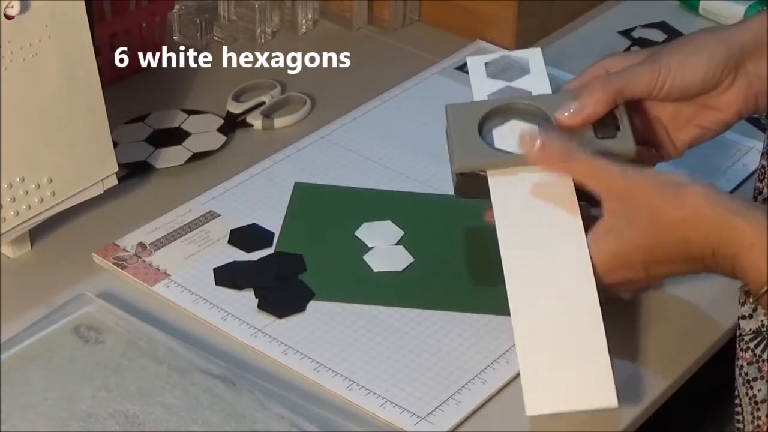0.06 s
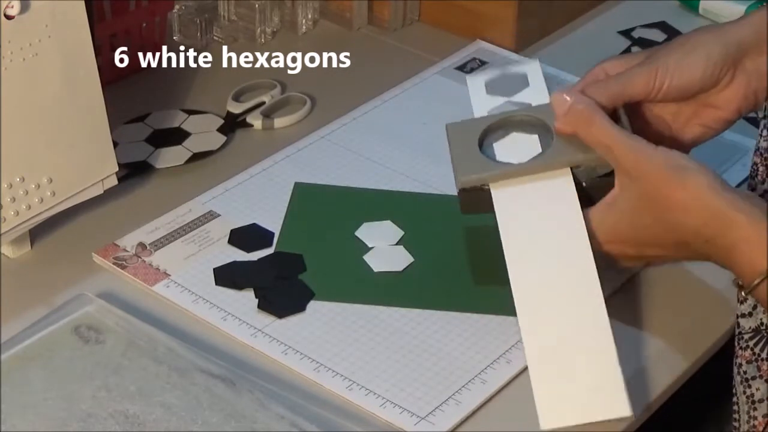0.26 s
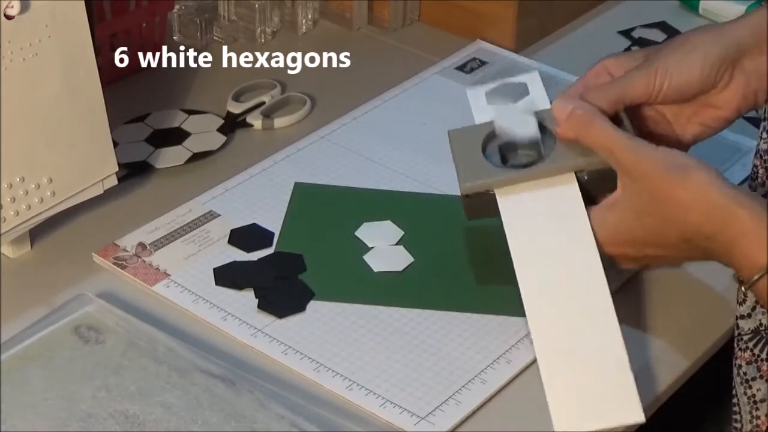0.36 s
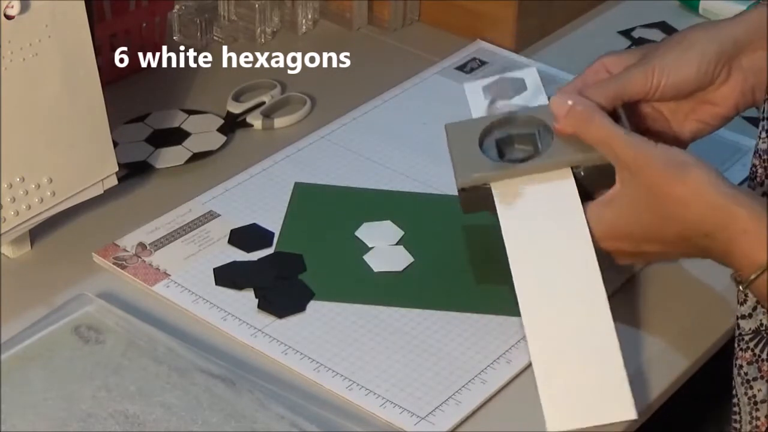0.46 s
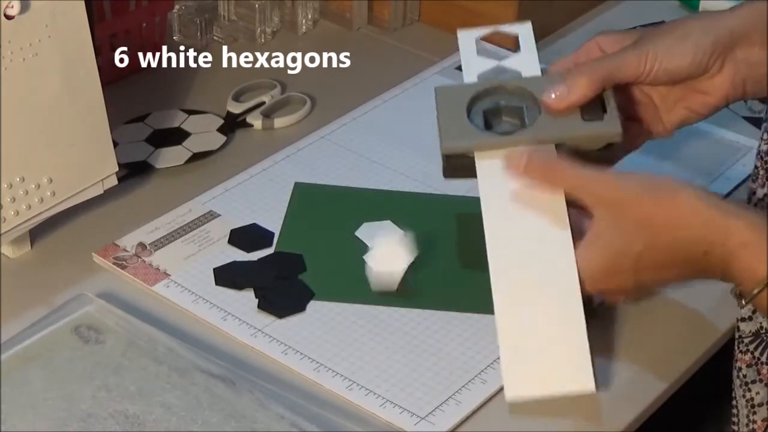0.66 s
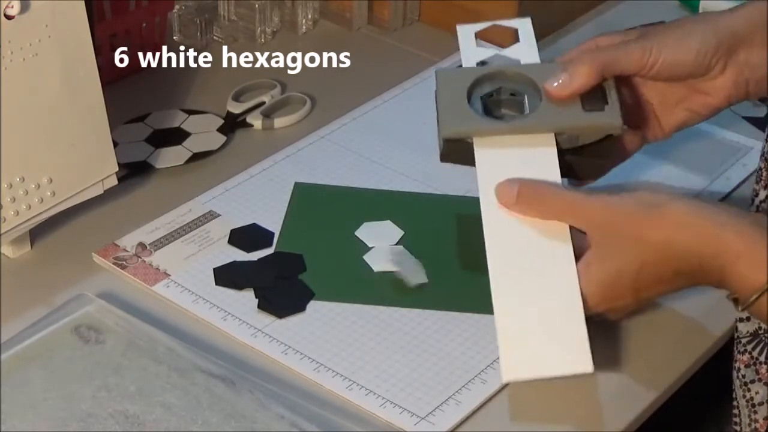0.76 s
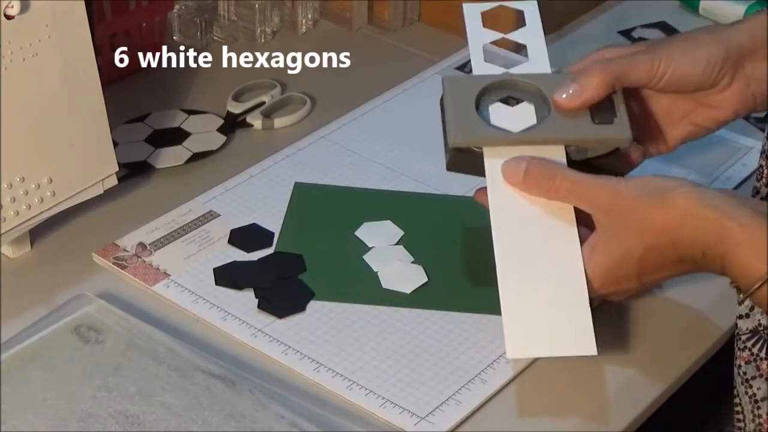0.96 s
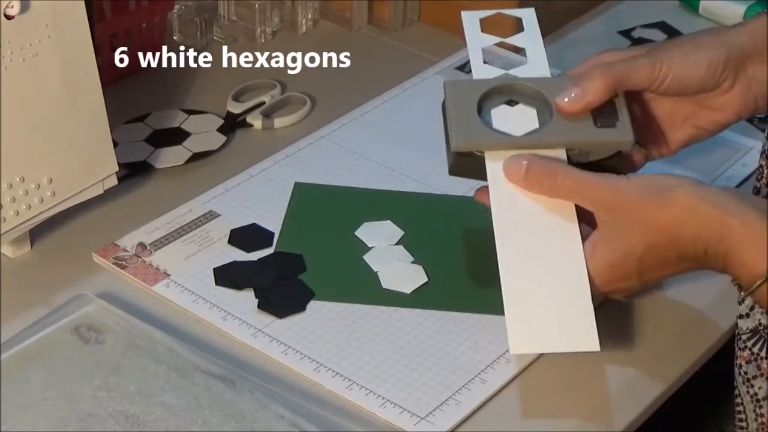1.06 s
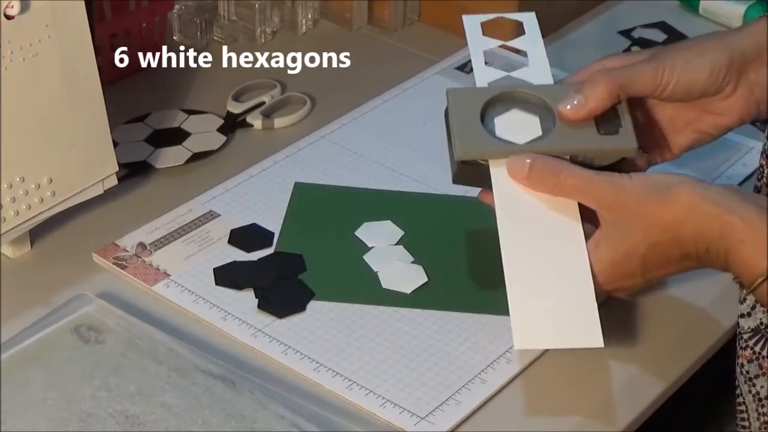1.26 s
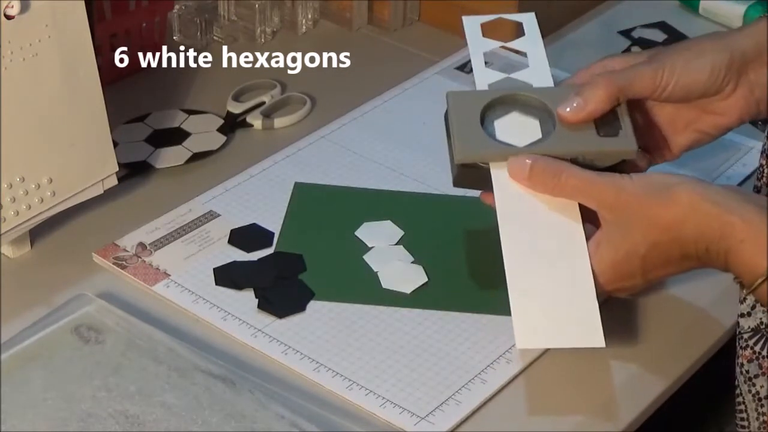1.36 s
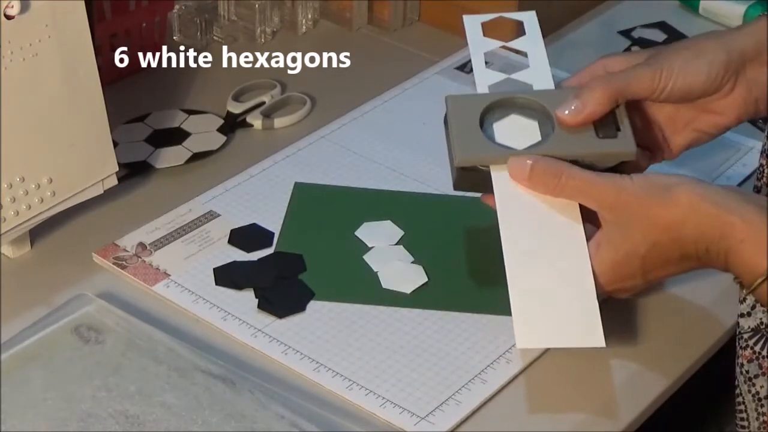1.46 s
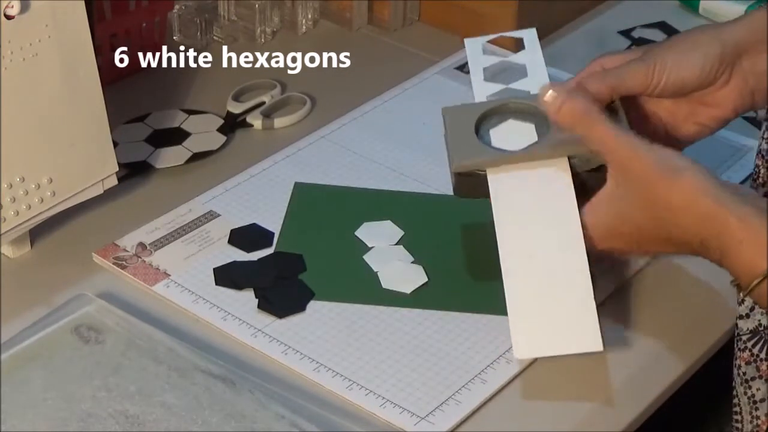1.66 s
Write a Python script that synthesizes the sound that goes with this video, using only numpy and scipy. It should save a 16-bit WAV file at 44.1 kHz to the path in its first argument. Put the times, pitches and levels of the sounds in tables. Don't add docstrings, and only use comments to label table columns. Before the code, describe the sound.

After near silence, one crisp crackling punch cut in stiff card, a short metallic rattle, lever clicks, then a papery rub and catch fading into soft room hush with faint even ticks, heard up close.

```python
import sys
import numpy as np
from scipy import signal
from scipy.io import wavfile
from scipy.ndimage import uniform_filter1d

SR = 44100
rng = np.random.default_rng(int(sys.argv[2]) if len(sys.argv) > 2 else 0)


def voltage_ratio(decibels):
    exponent = np.asarray(decibels, float) / 20
    return 10 ** exponent


def wav_record(signal):
    frames = np.transpose(np.atleast_2d(signal))
    bounded = np.clip(frames, -1, 1)
    quanta = np.round(bounded * 32767).astype(np.int16)
    wavfile.write(sys.argv[1], SR, quanta)


N = 74970

KNOCK_TIMES = [.2272, .2317, .241, .308, .3346, .3362, .3394, .5235, .5325, .6545, .700, .7153, .7262,
               .7278]
# (peak [dB], crack t60 [s], colour [Hz], colour level [dB], body ring [dB])
KNOCKS = [(-14.5, 0.017, 7300, -7.5, 3), (-14, 0.006, 3100, 4.5, 5), (-28.5, 0.057, 1580, 8.5, -7),
          (-17.5, 0.022, 3280, 5, -9.5), (-10.5, 0.0073, 2430, 0, -9.5), (-18.5, 0.0029, 10500, 18, -19),
          (-18, 0.015, 6700, 10, -1), (-41.5, 0.069, 12000, -1.5, -26), (-34.5, 0.014, 7300, 2, -3),
          (-22.5, 0.0061, 1940, 5, -21), (-46, 0.16, 9900, -21, -14), (-30, .016, 6500, 1, -8),
          (-23, 0.0058, 6400, 17, 5), (-18.5, 0.0095, 4560, -2, 5.5)]
# (start [s], rise [s], t60 [s], level [dB], body ring [dB])
CRUNCHES = [
    (0.2227, 0.0045, 0.077, -19.5, -36),
    (0.243, 0.0063, 0.11, -25.5, 2),
    (0.272, 0.0074, 0.063, -23.5, -6),
    (0.3041, 0.0011, 0.096, -19.5, -16.5),
    (0.308, 0.0023, 0.051, -40, 12.5),
    (0.328, 0.00091, 0.013, -23.5, -5),
    (0.659, 0.022, 0.057, -35, -28),
    (0.728, 0.002, 0.34, -36.5, -5),
]
# (time [s], peak [dB], t60 [s], resonance [Hz], width [Hz])
TAPS = [(0.0465, -49, 0.035, 6700, 1500), (0.0476, -51.5, .05, 10700, 700), (0.127, -47, 0.095, 3260, 300),
        (0.142, -53, 0.16, 3300, 400), (0.127, -64, .025, 6640, 6000), (.2035, -60, 0.015, 7800, 4000),
        (0.255, -22, 0.026, 3740, 600), (0.275, -25, 0.031, 592, 142), (.306, -26.5, 0.026, 546, 119),
        (0.775, -45, 0.12, 1560, 250), (.88, -48, 0.12, 3740, 1200), (.525, -44.5, 0.18, 906, 50.6),
        (.589, -43.5, 0.034, 6500, 5000), (.606, -47.5, 0.26, 3270, 500), (.6548, -36.5, 0.085, 507, 300),
        (0.6543, -35, 0.048, 900, 250), (0.681, -36, 0.095, 1390, 300), (1.452, -56, 0.04, 4260, 1500)]
# (time [s], level [dB])
RATTLE_LEVEL = [(.341, -40), (.347, -3), (.356, -2), (.37, -4), (.39, -9), (.44, -20.5), (.5, -32.5),
                (.56, -39), (.6, -89)]
# (time [s], level [dB])
SLIDE_LEVEL = [(0, -75), (.05, -76), (.085, -82), (.14, -82), (.19, -54), (.215, -54), (.58, -56),
               (.61, -46.5), (.645, -38.5), (.72, -33.5), (.78, -40.5), (.825, -37.5), (.92, -47.5),
               (.97, -51.5), (1.1, -60), (1.47, -94), (1.6, -69), (1.7, -55.5)]
# (mode [Hz], level [dB], t60 [s])
PRESSED_MODES = [(524, -1.5, 0.16), (632, -3.5, 0.15), (790, -2, 0.04), (1013, -12, 0.068),
                 (1080, -7.5, 0.082), (1330, 7.5, 0.033), (1329, 18, 0.035), (1455, 12, 0.04),
                 (1533, 3, 0.054), (1775, -2.5, 0.21), (2040, -4, 0.12), (2205, 0.5, 0.12),
                 (3540, 11.5, 0.035), (5620, 13, 0.014)]
# (mode [Hz], level [dB], t60 [s])
FREE_MODES = [(917, 1, 0.091), (1078, 7, 0.085), (1206, -8, 0.099), (1268, 7, 0.11), (1396, 3.5, 0.044),
              (1520, 0.5, 0.11), (1595, 9.5, 0.028), (1875, -18, 0.13), (2138, 0, 0.11), (2340, 2.5, 0.046),
              (3460, -1, 0.05), (4320, -10, 0.079), (5100, 0.5, 0.05), (6700, -4, 0.032)]
# (mode [Hz], level [dB], t60 [s])
CATCH_MODES = [(1070, -15, 0.08), (1203, -9.5, 0.18), (1388, 0, 0.021), (1437, -6, 0.064),
               (1618, 6.5, 0.043), (2060, -4, 0.066), (3570, -22, 0.016), (4474, 8.5, 0.0099),
               (6100, -5, 0.047), (8010, 10.5, 0.009), (9200, -8, 0.038)]
# (frequency [Hz], density [dB per Hz])
CRACK_TONE = [(120, -36), (200, -28), (503, -10), (1000, -9.5), (1420, -2), (2400, -5.5), (3700, -3.5),
              (11000, -4.5)]
# (frequency [Hz], density [dB per Hz])
RATTLE_TONE = [(400, -39), (650, -22), (900, -11), (1300, 1), (1750, -7), (6400, -7.5), (11000, -13),
               (14000, -41)]
# (frequency [Hz], density [dB per Hz])
SLIDE_TONE = [(350, -47), (600, 4.5), (678, -30), (747, 3), (2850, 2.5), (4360, 5), (11000, -2),
              (14300, -58), (22000, -120)]
# (frequency [Hz], density [dB per Hz])
HUSH_TONE = [(20, -31), (45, -27), (85, -14), (157, -9.5), (252, -7.5), (295, -6.5), (328, -10.5),
             (385, -9.5), (572, -13), (11000, -34.5), (14300, -75.5), (22000, -120)]
# (frequency [Hz], likeness [0-1])
LIKENESS = [(60, 1), (350, 0.85), (1980, 0.32), (11400, 0.74)]

THROUGH_S, CATCH_S = 0.325, 0.69
PRESSED_LOW_HZ, THROUGH_LOW_HZ, CATCH_LOW_HZ = 381, 700, 1100


def knocks():
    crack, drive = np.zeros(N), np.zeros(N)
    colour_q = 3.0
    noises = rng.standard_normal((len(KNOCKS), 5000))
    for s, knock, noise in zip(KNOCK_TIMES, KNOCKS, noises):
        db, t60, hz, colour_db, ring_db = knock
        puff = burst(noise, db - 4, t60)
        plain = like(coloured(puff, CRACK_TONE), puff)
        colour = like(resonate(puff, hz, hz / colour_q), puff)
        add(crack, s, plain + voltage_ratio(colour_db) * colour)
        blow = voltage_ratio(ring_db + 1) * np.linalg.norm(puff, keepdims=True)
        add(drive, s, blow)
    return held(crack, drive)


def crunches():
    level, ring = np.zeros(N), np.zeros(N)
    t = np.arange(12000) / SR
    for s, rise, t60, db, ring_db in CRUNCHES:
        decay = voltage_ratio(db - 60 * np.maximum(t - rise, 0) / t60)
        shape = np.minimum(t / rise, 1) * decay
        add(level, s, shape)
        add(ring, s, shape * voltage_ratio(ring_db))
    source = grit(per_s=4500, spread_db=4.7, fizz=0.91)
    return held(coloured(source * level, CRACK_TONE), source * ring)


def held(crack, drive):
    t = np.arange(N) / SR
    pressed, catch = t <= THROUGH_S, t > CATCH_S
    through = ~pressed & ~catch
    states = [(pressed, PRESSED_MODES, PRESSED_LOW_HZ),
              (through, FREE_MODES, THROUGH_LOW_HZ),
              (catch, CATCH_MODES, CATCH_LOW_HZ)]
    return sum(above(crack * during + body(drive * during, modes), low_hz)
               for during, modes, low_hz in states)


def body(x, modes):
    longest_t60_s = 0.12
    t = np.arange(9000) / SR
    ring = np.zeros(len(t))
    for hz, db, t60 in modes:
        ring += voltage_ratio(db - 60 * t / min(t60, longest_t60_s)) * np.sin(2 * np.pi * hz * t)
    return signal.oaconvolve(x, ring / np.linalg.norm(ring))[:len(x)]


def taps():
    out = np.zeros(N)
    noises = rng.standard_normal((len(TAPS), 9000))
    for (s, db, t60, hz, width_hz), noise in zip(TAPS, noises):
        puff = burst(noise, db - 5.5, t60)
        add(out, s, rung_puff(puff, hz, width_hz))
    return above(out, 216)


def rattle():
    body_db, close_db, spread_db = -3.5, -18.5, -19
    level = curve(RATTLE_LEVEL)
    source = grit(per_s=2200, spread_db=3.2, fizz=0.5) * level
    close = coloured(source, RATTLE_TONE) + voltage_ratio(body_db) * body(source, FREE_MODES)
    spread = wide(RATTLE_TONE, voltage_ratio(spread_db) * level, patchy_db=0.69, swell_db=0.63)
    return voltage_ratio(close_db) * above(close, THROUGH_LOW_HZ) + spread


def slide():
    close_db, spread_db = -8.5, -11
    level = curve(SLIDE_LEVEL)
    grain = grit(per_s=1100, spread_db=2.8, fizz=1)
    close = coloured(grain * level, SLIDE_TONE)
    spread = wide(SLIDE_TONE, voltage_ratio(spread_db) * level, patchy_db=5.4, swell_db=1.7)
    return voltage_ratio(close_db) * close + spread


def room(x):
    t60_s, length, spacing = 0.11, SR // 2, 20
    starts = np.arange(260, length - spacing, spacing)
    shape = (2, len(starts))
    places = starts + rng.integers(0, spacing, shape)
    echoes = np.zeros((2, length))
    np.put_along_axis(echoes, places, rng.choice([-1.0, 1.0], shape), 1)
    echoes *= voltage_ratio(-60 * np.arange(length) / SR / t60_s)
    return signal.fftconvolve(x[None], echoes / np.linalg.norm(echoes[0]), axes=1)[:, :N]


def ticks():
    start_s, every_s = 0.0533, 0.08
    db, t60_s, hz, width_hz = -56, 0.02, 3100, 1300
    out = np.zeros(N)
    times = np.arange(start_s, N / SR, every_s)
    for s, noise in zip(times, rng.standard_normal((len(times), 1200))):
        add(out, s, rung_puff(burst(noise, db, t60_s), hz, width_hz))
    return out


def hush():
    return wide(HUSH_TONE, voltage_ratio(-57), patchy_db=0.9, swell_db=0.4)


def wide(tone, level, patchy_db, swell_db):
    frames, hz = N // 128 + 5, np.fft.rfftfreq(512, 1 / SR)
    a, b, c, d, patches = rng.standard_normal((frames, 257, 5)).T
    patches = uniform_filter1d(patches, size=8, axis=0)
    patches = evened(uniform_filter1d(patches, size=10, axis=1))
    swell = evened(uniform_filter1d(rng.standard_normal(frames), size=6))
    same = np.clip(read(LIKENESS, hz), -1, 1)[:, None]
    left, other = a + 1j * b, c + 1j * d
    right = same * left + np.sqrt(1 - same ** 2) * other
    z = np.array([left, right])
    z *= voltage_ratio(read(tone, hz)[:, None] + patchy_db * patches + swell_db * swell)
    noise = signal.istft(z, nperseg=512, noverlap=384)[1][:, :N]
    return level * evened(noise)


def grit(per_s, spread_db, fizz):
    chance, size, noise = rng.random(N), rng.exponential(1, N), rng.standard_normal(N)
    sizes = voltage_ratio(spread_db * np.minimum(size, 3))
    clicks = (chance < per_s / SR) * np.sign(noise) * sizes
    return evened(evened(clicks) + fizz * noise)


def burst(noise, db, t60):
    blow = 4.3
    shape = voltage_ratio(db - 60 * np.arange(len(noise)) / SR / t60)
    struck = np.append(blow, noise[1:]) * shape
    return like(struck, shape)


def rung_puff(puff, hz, width_hz):
    once = resonate(puff, hz, width_hz)
    return like(resonate(once, hz, 2 * width_hz), puff)


def resonate(x, hz, width_hz):
    t = np.arange(1500) / SR
    ring = np.exp(-np.pi * width_hz * t) * np.sin(2 * np.pi * hz * t)
    return signal.oaconvolve(x, ring / np.linalg.norm(ring))[:len(x)]


def coloured(x, tone):
    hz = np.abs(np.fft.fftfreq(2048, 1 / SR))
    log_gain = read(tone, hz) * np.log(10) / 20
    response = np.exp(np.conj(signal.hilbert(log_gain)))
    impulse = np.fft.ifft(response).real[:1024]
    return signal.oaconvolve(x, impulse / np.linalg.norm(impulse))[:len(x)]


def above(x, low_hz):
    return signal.sosfilt(signal.butter(6, low_hz, "high", fs=SR, output="sos"), x)


def evened(x):
    return x / np.sqrt(np.mean(x ** 2) + 1e-20)


def like(x, model):
    return x * np.linalg.norm(model) / np.linalg.norm(x)


def read(points, hz):
    f, value = np.transpose(points)
    return np.interp(np.log(hz + 1), np.log(f + 1), value)


def curve(points):
    s, db = np.transpose(points)
    return voltage_ratio(np.interp(np.arange(N) / SR, s, db))


def add(mix, s, sound):
    part = mix[round(s * SR):][:len(sound)]
    part += sound[:len(part)]


def scene():
    room_db, lean_db = -9, -0.1
    punch = knocks() + crunches() + taps()
    mix = punch + voltage_ratio(room_db) * room(punch)
    mix = mix + rattle() + slide() + ticks() + hush()
    return mix * voltage_ratio(np.array([[lean_db], [-lean_db]]))


def low_pass(x):
    return signal.sosfilt(signal.butter(12, 12010, fs=SR, output="sos"), x)


def record(dry):
    edge = signal.firwin(301, 11050, window=("kaiser", 3.5), fs=SR)
    finished = signal.oaconvolve(dry, edge[None], "same")
    return low_pass(finished)


dry = scene()
out = record(dry)
wav_record(out)
```